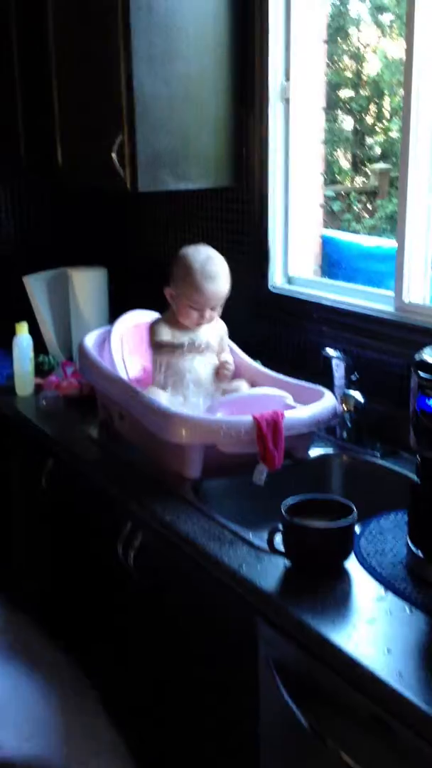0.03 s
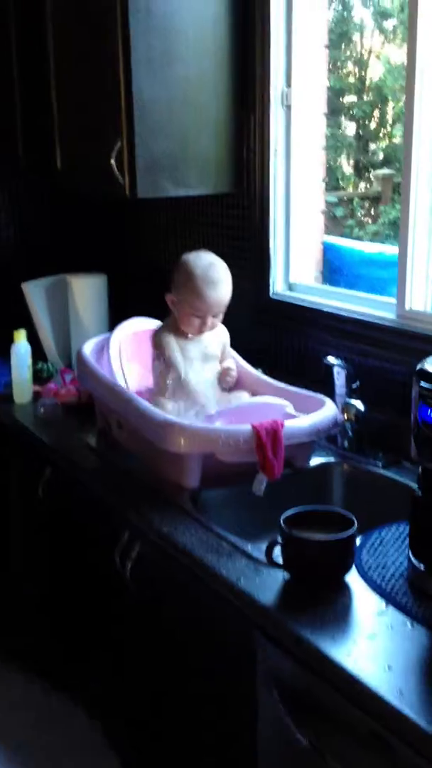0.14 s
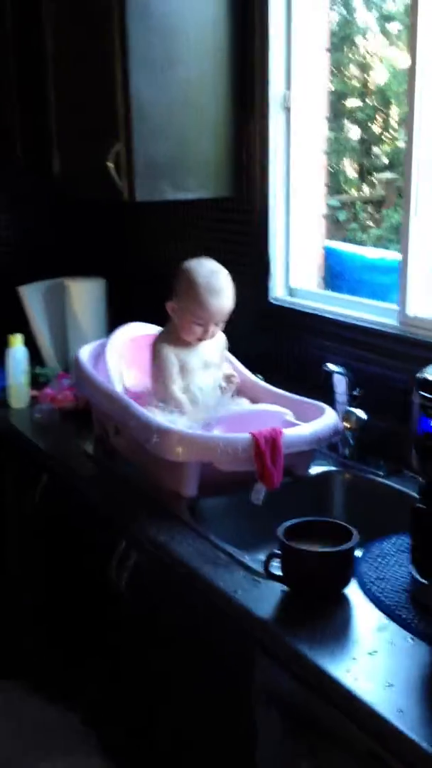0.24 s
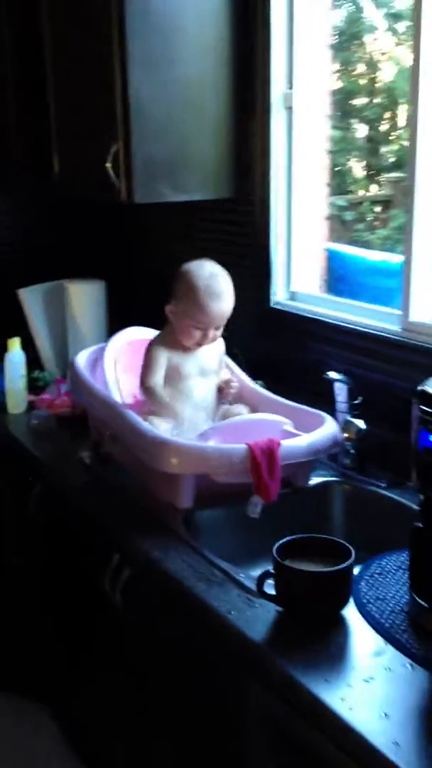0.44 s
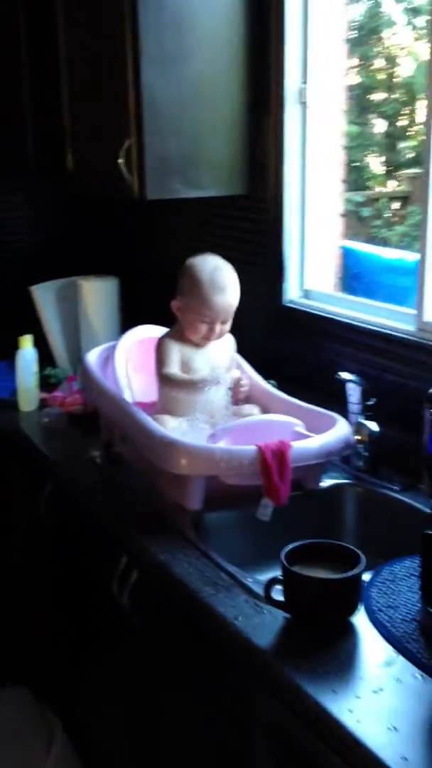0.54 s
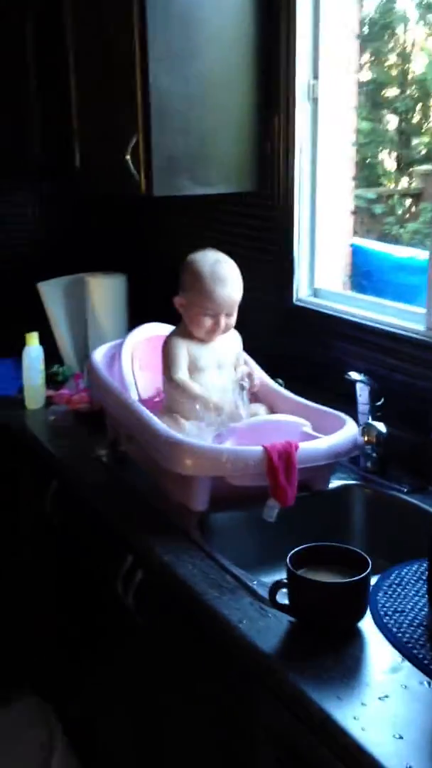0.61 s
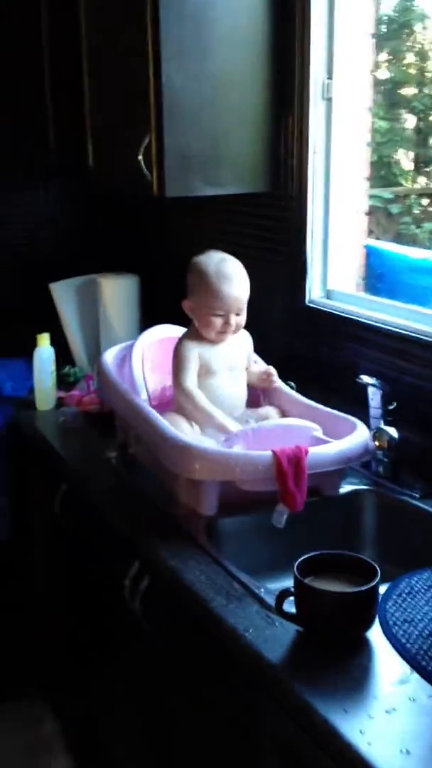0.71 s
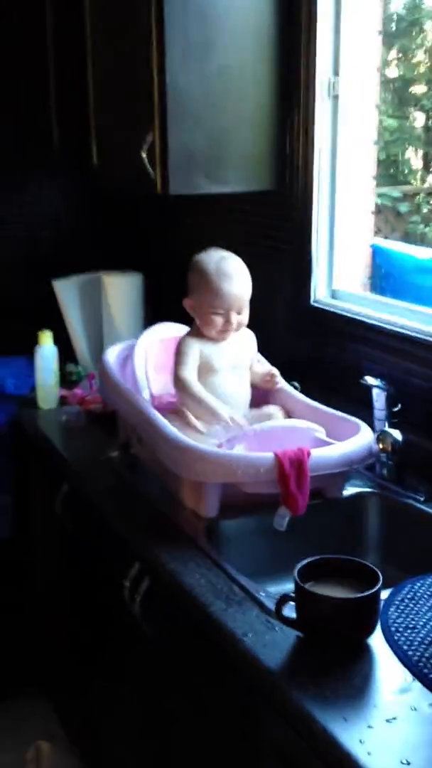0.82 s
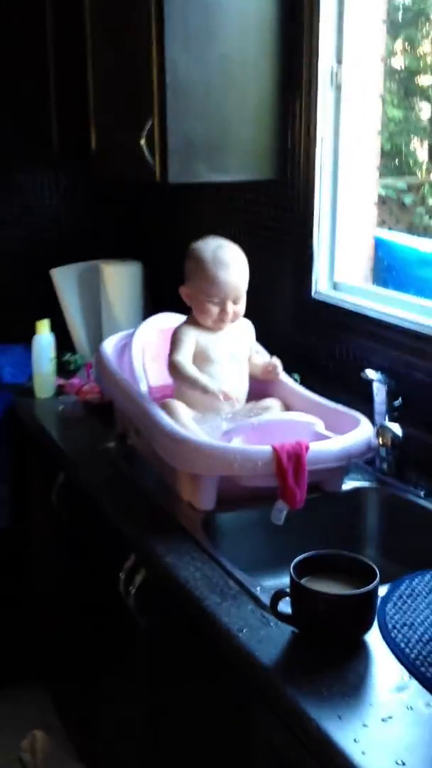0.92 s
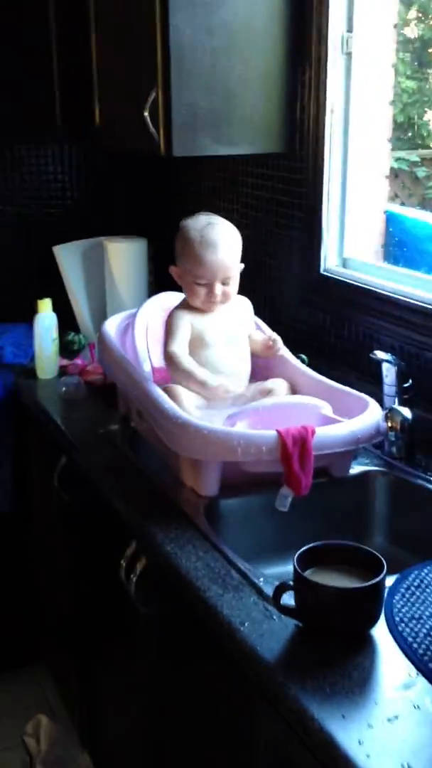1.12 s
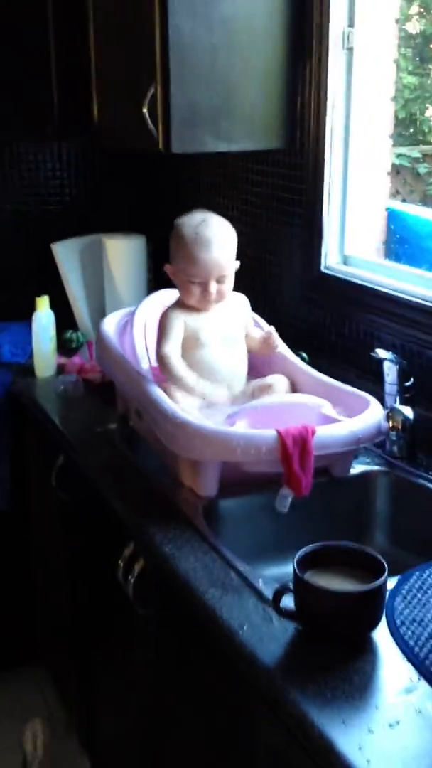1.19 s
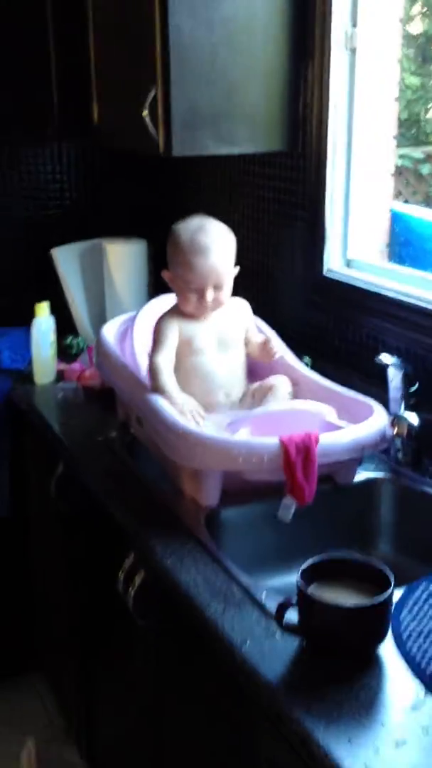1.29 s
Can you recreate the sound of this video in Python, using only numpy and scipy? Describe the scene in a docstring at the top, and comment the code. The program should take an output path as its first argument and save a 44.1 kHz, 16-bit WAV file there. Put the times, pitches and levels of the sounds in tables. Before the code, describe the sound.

Water splashes as a baby's hand slaps it in a small plastic tub, about a metre away. Plops and sloshing fade, then one sharp drop ticks close by. The kitchen rings briefly over a low appliance hum.

```python
"""A baby's hand slaps the water in a small plastic tub, about a metre from the microphone.
Each splash is a burst of mist and tiny ringing bubbles; the hand traps air pockets that plop.
The water sloshes and settles, the tub rings along, and one sharp drop ticks close by.
The tub stands on a kitchen counter, and the room rings briefly over a low appliance hum."""
import sys
import numpy as np
from scipy import signal
from scipy.fft import rfft, irfft
from scipy.io import wavfile
from scipy.ndimage import uniform_filter1d

SR = 44100
rng = np.random.default_rng(int(sys.argv[2]) if len(sys.argv) > 2 else 0)


def store_pcm(level_fs):
    """Save levels as 16-bit WAV."""
    pcm = np.round(np.clip(level_fs, -1, 1) * 32767).astype(np.int16)
    wavfile.write(sys.argv[1], SR, np.atleast_2d(pcm).T)


N = 59535
T = np.arange(N) / SR
FREQS = np.maximum(np.fft.rfftfreq(2 * N, 1 / SR), 1)

# Tone of the spray at the microphone. Each row: frequency in Hz, relative level in dB.
SPRAY_SPECTRUM = [(40, -42), (100, -16), (200, 4), (500, -12.5), (1200, 1.5), (2000, 2), (3000, 2),
                  (5000, 3), (7500, -0.5), (9600, -9.5), (11500, -25), (16000, -24)]
# Splashes in the tub. Each row: start in seconds, level in dB, rise and decay in seconds,
# band centre in Hz, band width in octaves, treble fizz in dB relative to that band.
SPLASH_BURSTS = [(.07, -50, 0.0093, 0.25, 1770, 1.8, -15.5),
                 (0.157, -51.5, 0.0032, 0.022, 4470, 2.8, -14.5),
                 (0.2053, -34, 0.0061, 0.036, 3900, 1.4, -10.5), (0.245, -44, 0.005, 0.15, 2460, 1.15, -36),
                 (0.335, -42.5, 0.01, 0.037, 3920, 1.3, -14),
                 (0.343, -34.5, 0.023, 0.031, 2070, 0.97, -24.5),
                 (.405, -46.5, 0.0047, 0.18, 2130, 1.65, -21.5), (0.517, -44, 0.02, 0.049, 2180, 1.15, -21),
                 (.597, -50, 0.012, 0.11, 2600, 5.1, -15.5), (.683, -54, 0.0024, 0.015, 5900, 1.1, -0.5),
                 (.704, -44.5, 0.0047, 0.048, 2430, 0.83, -20), (0.72, -47, 0.0046, 0.029, 2920, 0.74, -19),
                 (0.77, -42.5, 0.0079, 0.027, 3400, 0.29, -29),
                 (0.793, -49.5, 0.007, 0.039, 1420, 1.5, -25), (0.821, -62.5, .003, 0.041, 5000, 1.9, -3.5),
                 (.87, -52.5, .005, 0.057, 2530, 0.42, -21), (1.03, -61.5, 0.0056, 0.038, 3700, 0.36, -14),
                 (1.075, -59, 0.0067, 0.029, 1600, 0.23, -29),
                 (1.135, -67.5, 0.011, 0.035, 4330, 0.35, -27)]

def splashes():
    """Slaps a metre away throw up droplets and fine mist; harder slaps throw more mist."""
    droplets = bubbles(641, 15460, cycles=2, spread_db=2.5, glide=0.032, count=5000)
    spray_gain, fizz_gain = colour(SPRAY_SPECTRUM), band(hz=12760, octaves=0.2)
    out = 0
    for start, db, rise, decay, hz, octaves, fizz_db in SPLASH_BURSTS:
        mist_db = -0.5 + 0.18 * (db + 48)  # relative to the droplets
        grain = np.roll(droplets, rng.integers(N)) + undb(mist_db) * rng.standard_normal(N)
        spray = shaped(grain, spray_gain * band(hz, octaves))
        fizz = undb(fizz_db) * shaped(grain, fizz_gain)
        out += undb(db) * envelope(start, rise, decay) * (spray + fizz)
    return out

def bubbles(lo_hz, hi_hz, cycles, spread_db, glide, count):
    """A steady stream of bubbles, each a short ring that rises in pitch."""
    out = np.zeros(N)
    for k, (when, pitch, size, length) in enumerate(rng.random((count, 4))):
        hz = min(lo_hz * (hi_hz / lo_hz) ** pitch, SR / 3)
        start = int((k + when) / count * N)
        decay = cycles * (.5 + length) / hz
        life = T[:min(int(5 * decay * SR), N - start)] / decay  # age in decay times
        gain = undb(-spread_db * np.log(max(size, .02))) * np.sqrt(hz)
        phase = 2 * np.pi * hz * decay * life * (1 + glide * life)
        out[start:start + len(life)] += gain * np.exp(-life) * np.sin(phase)
    return unit(out)

# Air trapped under the hand. Each row: start in seconds, starting pitch in Hz,
# level in dB before the swell is rounded, rise and decay in seconds.
AIR_POCKETS = [(.098, 652, -47, .007, .008), (.152, 825, -40, 0.0065, 0.0066),
               (.293, 675, -29, 0.011, 0.0047), (.319, 642, -28.5, 0.0093, 0.0049),
               (.339, 655, -30.5, .005, .004), (.348, 729, -15.5, 0.004, 0.0029),
               (.357, 660, -24.5, 0.0032, 0.0043), (.361, 844, -30.5, 0.0025, .009),
               (.371, 1106, -34, 0.0031, 0.0072), (.406, 694, -38, .004, .014),
               (.434, 718, -28.5, .003, 0.0021), (.4635, 863, -28, 0.0032, 0.004),
               (.482, 839, -39, 0.0069, 0.015), (.508, 920, -41, 0.0026, .018),
               (.523, 1980, -41, 0.0017, 0.028), (.574, 672, -41.5, 0.0059, .01),
               (.599, 650.6, -38.5, 0.014, 0.01), (.607, 1194, -44.5, 0.0026, 0.01),
               (.712, 644, -44, 0.0064, 0.0078), (.80, 598, -48, 0.0048, 0.01),
               (.825, 556.4, -49, 0.0054, 0.029), (1.3145, 1166, -45.5, 0.00073, 0.0036),
               (1.329, 1243, -58.5, 0.0046, .03)]

def plops():
    """Large air pockets swell as they pinch off, then ring and rise in pitch as they near the surface."""
    pinch_s, glide_per_s = 0.0033, 1.11
    out = 0
    for start, hz, db, rise, decay in AIR_POCKETS:
        age = T - start
        swell = uniform_filter1d(envelope(start, rise, decay), int(pinch_s * SR))
        phase = 2 * np.pi * hz * age * (1 + glide_per_s * age / 2)
        out += undb(db) * swell * np.sin(phase)
    return out

# Water moving in the tub. Each row: time in seconds, level in dB.
SLOSH_LEVEL = [(.08, -54.5), (.2, -60), (.3, -52), (.37, -41.5), (.42, -45), (.455, -43.5), (.5, -44),
               (.56, -53), (.62, -50), (.68, -59.5), (.73, -50), (.83, -61), (.93, -68), (1.35, -70)]
# Tone of that water. Each row: frequency in Hz, relative level in dB.
SLOSH_SPECTRUM = [(100, -26), (220, -9.5), (400, -11), (500, -10.5), (640, -3), (850, 0.5), (1000, 1),
                  (1230, -2.5), (1500, -12), (2500, -20), (6000, -48)]

def slosh():
    """Stirred water gurgles with middle-sized bubbles until it settles."""
    gurgle = bubbles(198.4, 2219, cycles=5.6, spread_db=3.5, glide=0.0095, count=900)
    return undb(curve(SLOSH_LEVEL)) * shaped(gurgle, colour(SLOSH_SPECTRUM))

def thump():
    """The plunging hand pushes the water against the tub: a short, dull rumble."""
    rumble = shaped(rng.standard_normal(N), band(hz=112, octaves=0.17))
    return undb(-56.5) * envelope(start=.352, rise=.018, decay=0.027) * rumble

# Drops near the microphone. Each row: start in seconds, level in dB, tilt in dB per octave.
DROP_HITS = [(.9282, -30, -1), (0.933, -46, 8)]
# The ring of each hit. Each row: frequency in Hz, relative level in dB, decay in seconds.
DROP_MODES = [(1640, -0.5, 0.0022), (3240, -6, 0.0014), (4540, -6.5, 0.001), (8150, -20.5, .0005)]

def ticks():
    """A near drop strikes a hard surface, and a smaller, brighter one follows."""
    out, lowest_hz = 0, DROP_MODES[0][0]
    for start, db, tilt in DROP_HITS:
        age = np.maximum(T - start, 0)
        for hz, mode_db, decay in DROP_MODES:
            gain = undb(db + mode_db + tilt * np.log2(hz / lowest_hz))
            out += gain * np.exp(-age / decay) * np.sin(2 * np.pi * hz * age)
    return signal.sosfilt(signal.butter(2, 1040, "high", fs=SR, output="sos"), out)

# The tub and its nook on the counter. Each row: frequency in Hz, gain in dB, seconds to fall 60 dB.
TUB_RESONANCES = [(615, -0.5, 0.39), (700, -21, 0.2), (811, -14, 0.9), (935, -7, 0.47), (1116, -3, 0.36),
                  (1279, -10, 0.42), (1223, 0.5, 0.12), (1710, 5.5, 0.44), (1920, -11, 0.24)]

def tub(water):
    """Every splash sets the narrow resonances of the tub and its nook ringing."""
    ring = 0
    for hz, db, t60 in TUB_RESONANCES:
        damping = np.log(1000) / t60
        gain = undb(db) * 2 * damping / SR
        ring += gain * np.exp(-damping * T) * np.cos(2 * np.pi * hz * T)
    return signal.fftconvolve(water, ring)[:N]

def kitchen(water):
    """Diffuse reflections from cupboards and tiles reach the microphone just after the direct sound."""
    delay_s, low_t60_s, treble_t60_s = 0.0079, 0.56, 0.58
    age = np.maximum(T - delay_s, 0)
    noise = rng.standard_normal(N)
    low = signal.sosfilt(signal.butter(2, 3000, fs=SR, output="sos"), noise)
    treble = noise - low
    tail = (low * undb(-60 * age / low_t60_s) + treble * undb(-60 * age / treble_t60_s)) * (age > 0)
    return undb(-10) * signal.fftconvolve(water, unit(tail) / np.sqrt(N))[:N]

# The kitchen's background noise. Each row: frequency in Hz, relative level in dB.
ROOM_SPECTRUM = [(20, -43), (60, -31), (110, -22.5), (165, -0.5), (230, -1.5), (310, -4.5), (390, -1.5),
                 (480, -8.5), (650, -10), (1100, -22), (1400, -12), (1800, -9), (2600, -21), (4000, -23.5),
                 (7000, -27), (9600, -38), (12500, -34), (15500, -26)]
# An appliance in the room. Each row: frequency in Hz, base level in dB.
HUM_TONES = [(239, -65), (380, -74.5)]
# The swell of its hum. Each row: time in seconds, dB added to the base level.
HUM_SWELL = [(.1, -3), (.98, -3.5), (1.1, 8), (1.22, -1), (1.35, 7.5)]

def room_tone():
    """Behind the water lie soft steady noise and an appliance hum that wavers in level and pitch."""
    out = undb(-57) * shaped(rng.standard_normal(N), colour(ROOM_SPECTRUM))
    for hz, db in HUM_TONES:
        waver = shaped(rng.standard_normal(N), band(hz=6.2, octaves=0.35))
        hum = (1 + 0.11 * waver) * np.sin(2 * np.pi * hz * T + 0.42 * waver)
        out += undb(db + curve(HUM_SWELL)) * unit(hum)
    return out

def undb(db):
    """Decibels to gain."""
    return 10 ** (np.asarray(db) / 20)

def unit(x):
    """Scale to rms 1."""
    return x / np.sqrt(np.mean(x ** 2))

def curve(points):
    """Value at every sample from (seconds, value) points."""
    return np.interp(T, *np.array(points).T)

def colour(points):
    """Gain at every frequency from (Hz, dB) points."""
    hz, db = np.array(points).T
    return undb(np.interp(np.log(FREQS), np.log(hz), db))

def band(hz, octaves):
    """A bell-shaped band on the octave scale."""
    return np.exp(-.5 * (np.log2(FREQS / hz) / octaves) ** 2)

def shaped(x, gain):
    """Filter a steady texture and scale it to rms 1."""
    return unit(irfft(rfft(x, 2 * N) * gain)[:N])

def envelope(start, rise, decay):
    """Smooth rise, then exponential decay; times in seconds."""
    age = T - start
    attack = np.sin(np.pi / 2 * np.clip(age / rise, 0, 1)) ** 2
    return attack * np.exp(-np.maximum(age - rise, 0) / decay)

def scene():
    """One microphone hears the water with the ring of tub and kitchen; the near ticks stay dry."""
    water = splashes() + plops() + slosh() + thump()
    return (water + tub(water) + kitchen(water) + ticks() + room_tone())[None]

def record(dry):
    """The microphone opens after a moment of silence; the top treble is cut steeply."""
    open_s, fade_s, top_hz = .084, .001, 15300
    opened = dry * np.clip((T - open_s) / fade_s, 0, 1)
    return signal.sosfilt(signal.ellip(10, .2, 80, top_hz, fs=SR, output="sos"), opened)

dry = scene()
out = record(dry)
store_pcm(out)
```